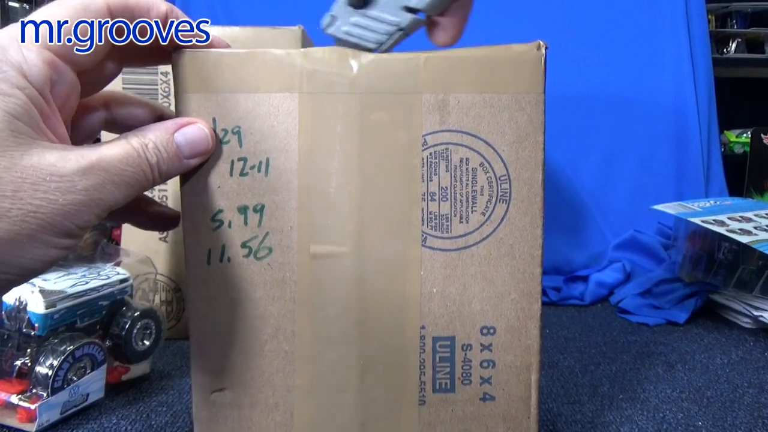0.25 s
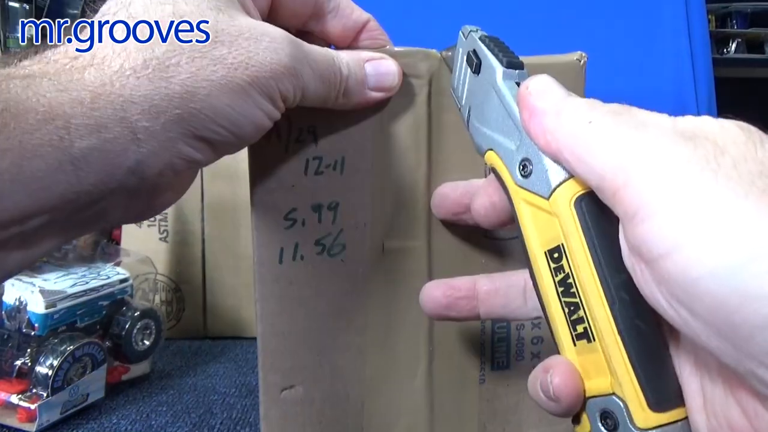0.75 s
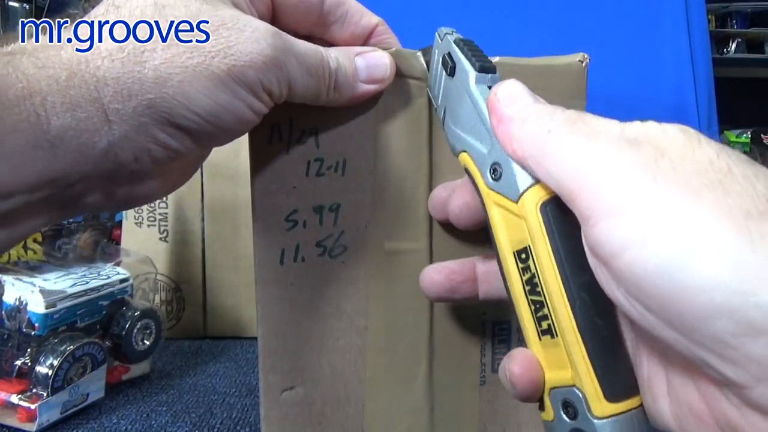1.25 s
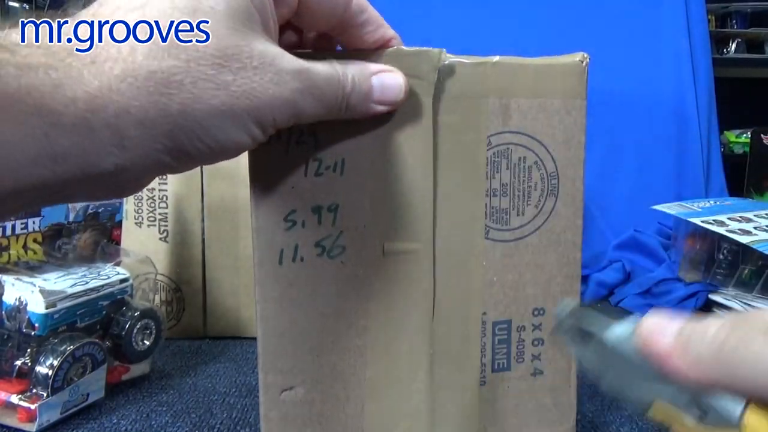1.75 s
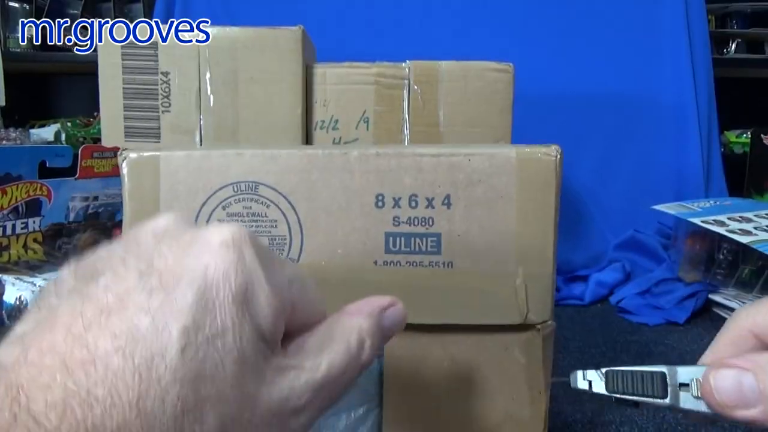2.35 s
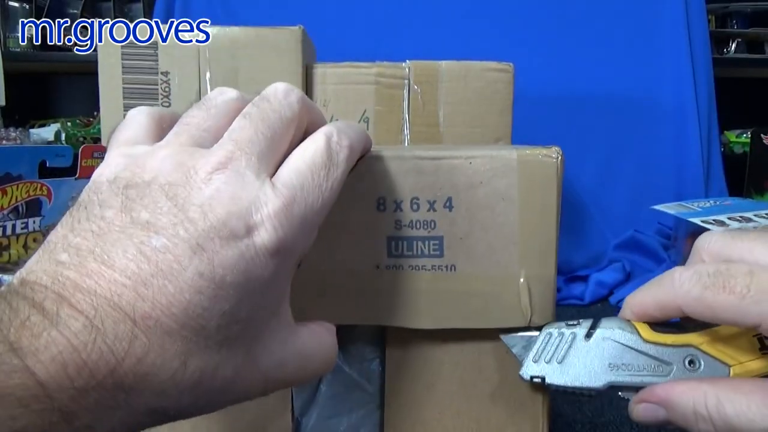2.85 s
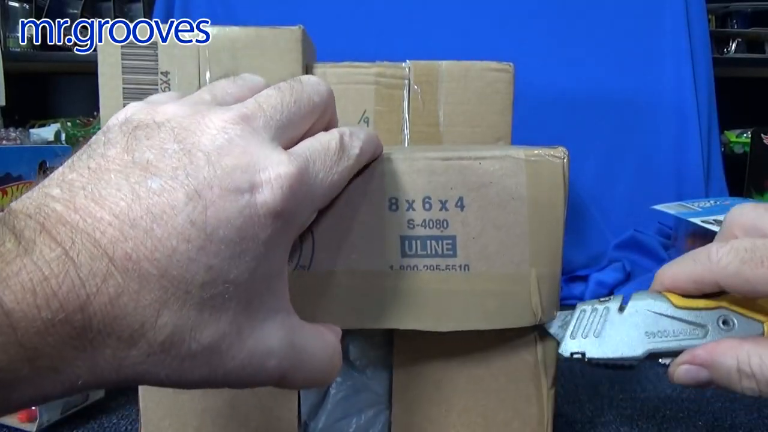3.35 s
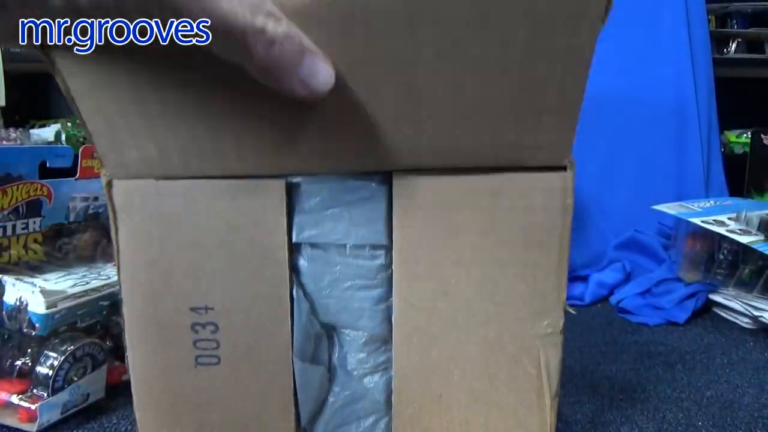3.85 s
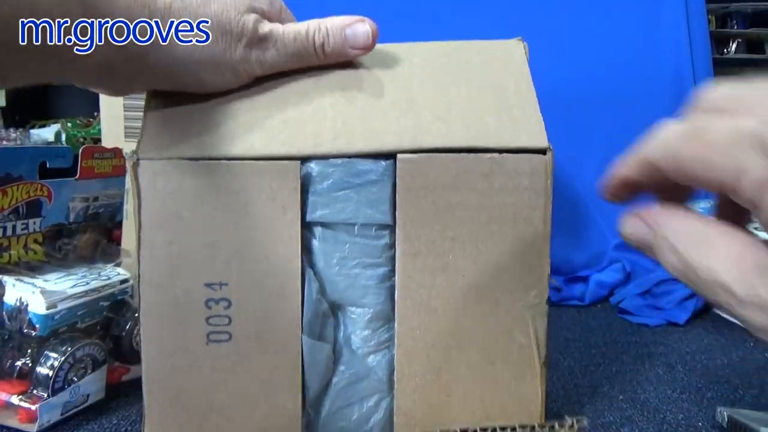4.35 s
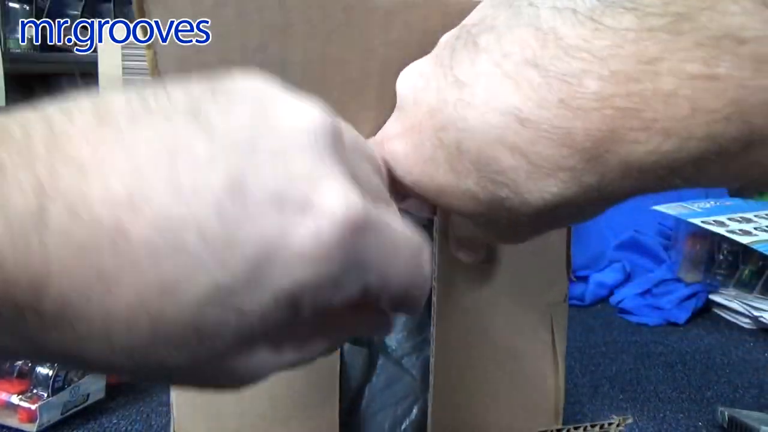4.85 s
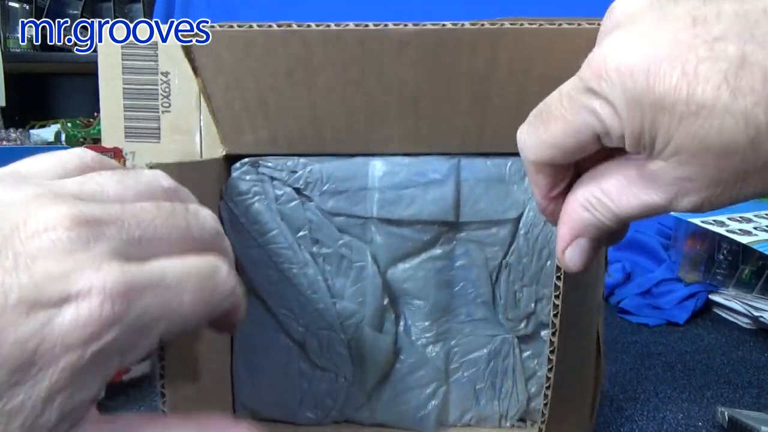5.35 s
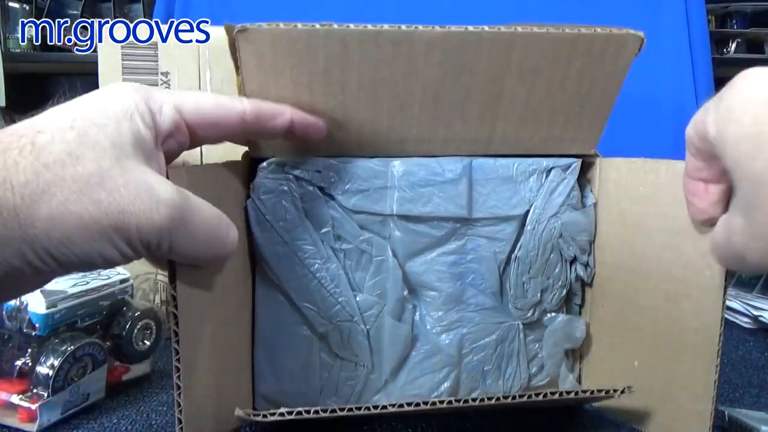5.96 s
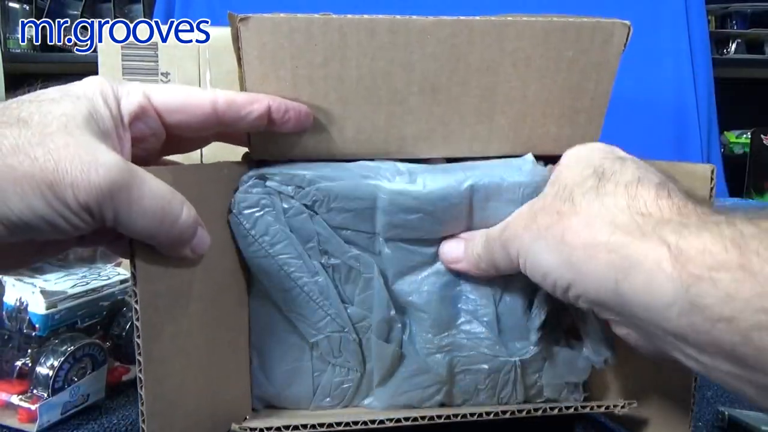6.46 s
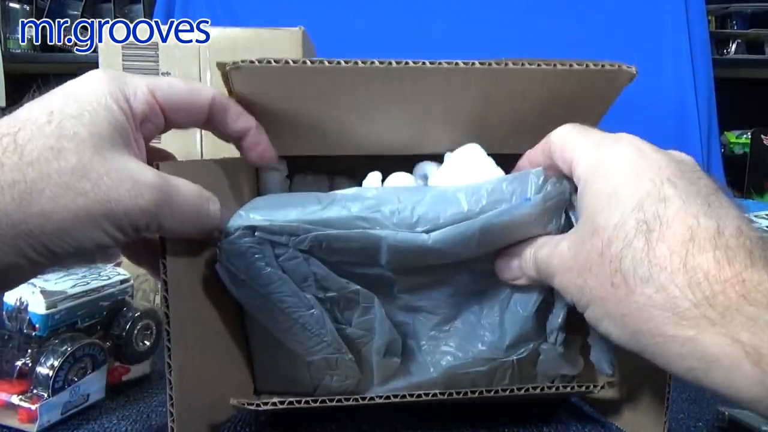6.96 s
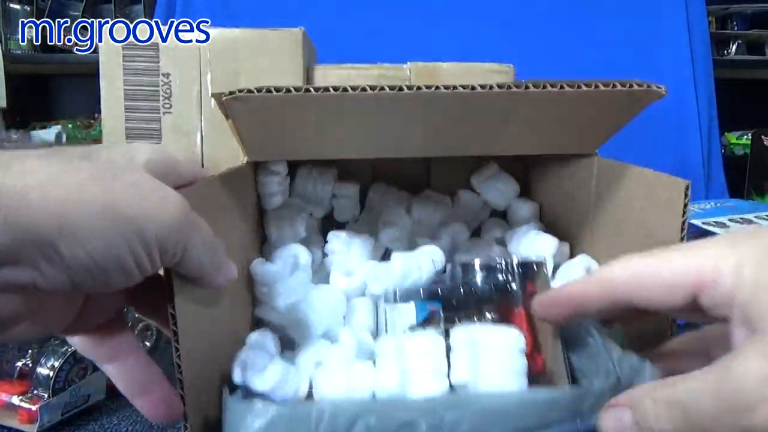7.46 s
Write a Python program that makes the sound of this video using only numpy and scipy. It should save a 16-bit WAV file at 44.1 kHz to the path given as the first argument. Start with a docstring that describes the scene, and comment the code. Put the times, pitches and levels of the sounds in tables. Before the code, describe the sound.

Close up in a small, dry-sounding room, a cardboard box is tapped and nudged across a cloth-covered table. A short rasp of a blade in tape leads to two loud snaps as the flaps come free, with small ticks of tape and creases. Cardboard then rubs against cardboard as the box opens wide, and the sound ends with a soft rustle of plastic and a few light bumps.

```python
"""Unpacking a small cardboard box

Hands turn a box on a cloth-covered table, a blade slits its tape, flaps pop open and slide, and a
plastic bag is lifted out, close up in a small damped room. Knocks and stick-slip rubbing set the
hollow box ringing, bumps thump the table, and tape and board tick as their creases let go."""
import sys
import numpy as np
from scipy import signal
from scipy.fft import rfft, irfft
from scipy.io import wavfile
from scipy.ndimage import uniform_filter1d

SR = 44100
rng = np.random.default_rng(int(sys.argv[2]) if len(sys.argv) > 2 else 0)


def put_to_file(sound):
    """Save the sound as 16-bit audio at rate SR, in the file named by the first command-line argument."""
    columns = np.atleast_2d(sound).T  # one column per channel
    safe = np.clip(columns, -1, 1)
    whole_steps = np.round(safe * 32767)
    wavfile.write(sys.argv[1], SR, whole_steps.astype(np.int16))


N = 340011


def gain_of(db):
    """Decibels to amplitude."""
    return 10 ** (np.asarray(db) / 20)


def unit_rms(x):
    """Scales to rms 1."""
    return x / np.sqrt(np.mean(x ** 2) + 1e-20)


def at_peak(x, db):
    """Scales to a peak level in dB."""
    return gain_of(db) * x / abs(x).max()


def curve_at(points, hz):
    """Value of a curve on a log-frequency axis."""
    f, value = np.transpose(points)
    return np.interp(np.log(hz + 1), np.log(f + 1), value)


def add(mix, start, sound):
    """Mixes a sound in at a time in seconds."""
    part = mix[max(round(start * SR), 0):][:len(sound)]
    part += sound[:len(part)]


def high_pass(x, hz):
    """A small body radiates no deep bass."""
    return signal.sosfilt(signal.butter(3, hz, "high", fs=SR, output="sos"), x)


def impulse(points):
    """Minimum-phase impulse response of an EQ curve."""
    db = np.maximum(curve_at(points, abs(np.fft.fftfreq(4096, 1 / SR))), -100)
    log_gain = signal.hilbert(np.log(gain_of(db)))
    return np.fft.ifft(np.exp(np.conj(log_gain))).real[:2048]


def excite(drive, response):
    """Plays a scene-long signal through an impulse response."""
    return signal.oaconvolve(drive, response)[:N]


def rings(modes, seconds):
    """One dying sine for each mode."""
    hz, db, t60 = np.transpose(modes)[:, :, None]
    t = np.arange(round(seconds * SR)) / SR
    return gain_of(db - 60 * t / t60) * np.sin(2 * np.pi * hz * t)


def slips(per_s, spread_db, flutter_db, flutter_s):
    """Stick-slip clicks of random sign and size whose strength flutters with the grip."""
    size = gain_of(spread_db * np.minimum(rng.exponential(1, N), 5)) * rng.standard_normal(N)
    hit = rng.random(N) < per_s / SR
    window = max(int(flutter_s * SR), 2)
    grip = unit_rms(uniform_filter1d(uniform_filter1d(rng.standard_normal(N), window), window))
    return size * hit * gain_of(flutter_db * grip)


# Tone of the cardboard's hiss and snaps. Each row: frequency in Hz, gain in dB.
SURFACE_EQ = [(1500, -16.5), (2900, -22.5), (4100, -25.5), (5000, -20.5), (6500, -20.5), (10500, -21.5),
              (16000, -28)]


def surface_spot(chance):
    """The surface's impulse response, with other bands favoured at each spot."""
    hz = np.geomspace(1500, 16000, 10)
    db = curve_at(SURFACE_EQ, hz) + 4.5 * chance[:len(hz)]
    return impulse(np.transpose([hz, db]))


# Resonances of the hollow box. Each row: frequency in Hz, relative level in dB, t60 in seconds.
BOX_MODES = [(257, 1, 0.028), (355.6, 0, 0.049), (430, 8.5, 0.038), (534, 10.5, 0.025), (744, 5.5, 0.016),
             (946, 7.5, 0.01), (1020, 8, 0.012), (1374, 5, 0.01), (2033, -2.5, 0.0071), (2470, -14, 0.0084)]
# Knocks, flap pops and tape snaps. Each row: time in seconds, panel peak in dB, cavity peak in dB,
# favoured cavity pitch in Hz, snap peak in dB.
KNOCK_HITS = [(0.037, -40, -41.5, 360, -41.5), (0.088, -46, -34.5, 540, -51), (0.363, -21, -28, 500, -20.5),
              (0.371, -45, -14.5, 420, -40), (0.493, -33, -27.5, 263, -38), (0.549, -33, -43, 264, -30.5),
              (0.811, -36.5, -41, 268, -48), (1.183, -59, -43, 579, -22), (1.359, -27.5, -28.5, 540, -28),
              (1.474, -40, -36.5, 455, -31), (1.691, -33, -21, 550, -48), (1.946, -28.5, -27.5, 580, -78),
              (2.065, -36.5, -48, 404, -45.5), (2.195, -18.5, -42, 580, -25), (2.207, -4.5, -10, 310, -6.5),
              (2.232, -12, -17.5, 240, -18), (2.291, -15.5, -15, 265, -45), (2.466, -42.5, -35.5, 254, -68),
              (2.867, -55.5, -28.5, 272, -62), (3.199, -27.5, -16, 397, -65),
              (3.322, -22.5, -22.5, 222, -17), (3.5506, -6, -8.5, 420, -5), (3.671, -28, -30, 406, -31),
              (4.797, -58, -37, 220, -42), (4.96, -45, -36.5, 444, -43), (4.998, -34, -22.5, 443, -41),
              (5.114, -26, -28, 498, -64), (5.322, -18.5, -16.5, 520, -56), (5.681, -20, -16, 326, -23.5),
              (5.856, -38, -22.5, 447, -34.5), (6.024, -56, -25.5, 225, -27), (6.308, -51, -27, 365, -48),
              (6.649, -46, -27.5, 514, -39), (6.709, -28, -28, 343, -45), (6.916, -25.5, -42, 543, -87),
              (7.002, -32.5, -39, 540, -86), (7.058, -28.5, -36, 228, -90), (7.573, -26.5, -31.5, 377, -36)]


def knocks():
    """A faint noise swell leads into each ragged blow, which rings cavity and panel and snaps on top."""
    out, mode_hz = np.zeros(N), np.transpose(BOX_MODES)[0]
    lead_s, panel_from_hz = .04, 700
    t = np.arange(-lead_s, .04, 1 / SR)
    after = np.maximum(t, 0)
    lead_in = np.where(t < 0, .02, .06) * np.exp(-abs(t) / 0.0096)
    blow = lead_in + after / 0.0031 * np.exp(1 - after / 0.00065)
    crackle_tail = (t > 0) * 0.11 * np.exp(-after / 0.028)
    crackle = 1.7 * lead_in + after / 0.00078 * np.exp(1 - after / 0.0012) + crackle_tail
    push = (t > 0) * np.sin(after / 0.0058) * np.exp(-after / 0.0059)  # air shoved by the board
    for start, panel_db, cavity_db, hz, snap_db in KNOCK_HITS:
        cavity_noise, panel_noise, snap_noise = rng.standard_normal((3, len(t)))
        retune = 1 + 0.041 * snap_noise[0]  # the grip retunes the box a little
        box = rings(np.multiply(BOX_MODES, [retune, 1, 1]), .12)
        cavity_mix = (mode_hz < panel_from_hz) * gain_of(-30 * np.log2(mode_hz / hz) ** 2)
        cavity = high_pass(signal.fftconvolve(cavity_mix @ box, (1 + .5 * cavity_noise) * blow), 188)
        tilt_db_per_octave = min(1.1 * (snap_db - panel_db + 11.0), 5.5)  # snappy blows ring brighter
        panel_mix = (mode_hz >= panel_from_hz) * gain_of(tilt_db_per_octave * np.log2(mode_hz / 1000))
        panel = high_pass(signal.fftconvolve(panel_mix @ box, panel_noise * blow), 446)
        snap = signal.fftconvolve(snap_noise * crackle, surface_spot(cavity_noise))
        skip = max(round((lead_s - start) * SR), 0)
        for db, sound in ((panel_db, panel), (panel_db - 28, push), (cavity_db, cavity), (snap_db, snap)):
            add(out, start - lead_s, at_peak(sound, db)[skip:])
    return out


def contact_power(strokes, scratch_db):
    """Power of hiss, drone and scratch over all strokes; the scratch follows a blend of the other two."""
    power, drone_share = np.zeros((3, N)), 0.28
    for start, length, hiss_db, drone_db in strokes:
        span = slice(round(start * SR), round((start + length) * SR))
        blend_db = hiss_db + drone_share * (drone_db - hiss_db)
        power[:, span] += gain_of([[hiss_db], [drone_db], [blend_db + scratch_db]]) ** 2
    return power


def wander(x, depth_db):
    """The rubbed spot wanders, so bands of the noise swell and fade on their own."""
    bands = signal.stft(x, nperseg=256)[2]
    swell = uniform_filter1d(rng.standard_normal(bands.shape), size=7, axis=0)
    swell = unit_rms(uniform_filter1d(swell, size=18, axis=1))
    return unit_rms(signal.istft(bands * gain_of(depth_db * swell), nperseg=256)[1][:N])


# Skin, blade and flaps stroke the board; fingers grip the bag.
# Each row: start in seconds, length in seconds, hiss level in dB, box drone level in dB.
BOARD_STROKES = [(0.0, 0.78, -72.5, -61), (0.15, 0.32, -55, -49.5), (0.33, .18, -53.5, -40),
                 (0.51, 0.13, -58.5, -59), (1.18, 0.078, -64, -46.5), (1.43, 0.29, -59, -55.5),
                 (1.47, 0.13, -51, -47), (1.64, 0.062, -50, -40.5), (1.71, 0.8, -68.5, -57),
                 (1.88, 0.084, -57, -54), (2.15, 0.23, -56.5, -47.5), (2.72, 0.24, -57, -56),
                 (2.83, 0.027, -45, -51), (2.95, 3.1, -65, -62.5), (3.32, 0.058, -48, -43),
                 (3.475, 0.025, -78, -41), (3.5, 0.063, -48, -37.5), (3.63, 0.75, -59.5, -64),
                 (3.82, 0.293, -52, -50.5), (4.43, 0.11, -54, -56), (4.71, 0.24, -56.5, -66.5),
                 (5.0, 0.73, -46.5, -43.5), (5.13, 0.15, -41, -55), (5.34, 0.074, -40, -55),
                 (5.45, 0.056, -42, -53), (5.69, 0.017, -31, -30), (5.73, 0.53, -59, -50),
                 (5.94, 0.24, -57.5, -45)]
BAG_GRIPS = [(6.27, 1.4, -53, -52), (6.28, 0.51, -54, -55), (6.43, 0.11, -45, -43),
             (6.5, 0.072, -44.5, -52), (6.59, 0.15, -46.5, -46), (6.77, 0.16, -49.5, -46.5),
             (7.05, 0.244, -56.5, -51.5), (7.32, 0.097, -50.5, -53), (7.57, 0.19, -51.5, -43.5)]
# Tone of the midrange scratch and of the bag's hiss. Each row: frequency in Hz, gain in dB.
SCRATCH_EQ = [(550, -26.5), (1100, -10), (1500, -13.5), (2100, -17.5), (3600, -22), (8000, -57)]
BAG_EQ = [(1200, -25.5), (2500, -24.5), (3400, -29.5), (5800, -21), (7000, -22), (16000, -28)]


def rubbing():
    """Trains of slips drive the surface, the board, the box and, through the box, the table."""
    resting_hands = (0.008, N / SR, -76, -68.5)  # one faint, scene-long stroke
    board = contact_power(BOARD_STROKES + [resting_hands], scratch_db=-4.5)
    bag = contact_power(BAG_GRIPS, scratch_db=-8.5)  # the soft bag scratches less
    power, fade_s = board + bag, 0.025
    levels_db = uniform_filter1d(10 * np.log10(power + 1e-12), int(fade_s * SR), axis=1)
    hiss_gain, drone_gain, scratch_gain = gain_of(levels_db)
    bag_share = np.clip(bag[0] / power[0], 0, 1)
    fine = slips(per_s=9000, spread_db=1.5, flutter_db=0.9, flutter_s=0.02)
    sparse = slips(per_s=45, spread_db=2.0, flutter_db=2.4, flutter_s=0.091)
    coarse = slips(per_s=1500, spread_db=2.0, flutter_db=3.0, flutter_s=0.012)
    on_board, on_bag = (unit_rms(excite(fine, impulse(eq))) for eq in (SURFACE_EQ, BAG_EQ))
    hiss = hiss_gain * wander((1 - bag_share) * on_board + bag_share * on_bag, depth_db=2.27)
    # now and then a fibre lets go alone, even under a light touch
    ticks = gain_of(-43.5) * np.sqrt(hiss_gain) * unit_rms(excite(sparse, impulse(SURFACE_EQ)))
    gritty = slips(per_s=3000, spread_db=1.3, flutter_db=2.7, flutter_s=0.0098)
    scratch = scratch_gain * wander(excite(gritty, impulse(SCRATCH_EQ)), depth_db=3.5)
    # each low mode is fed from its own spot of the board
    low_modes = rings(BOX_MODES, .12)[:6]
    box = sum(excite(np.roll(coarse, 9000 * k), mode) for k, mode in enumerate(low_modes))
    table = excite(coarse, rings(TABLE_MODES, .25).sum(axis=0))
    drone = unit_rms(high_pass(box, 247)) + gain_of(-11) * unit_rms(high_pass(table, 72))
    return hiss + ticks + scratch + drone_gain * drone


def friction_band(path, width):
    """Slips sing in a resonance that glides with the contact; width is a fraction of its mean pitch."""
    times, db, hz = np.transpose(path)
    t = np.arange(times[0], times[-1], 1 / SR)
    carrier = np.exp(2j * np.pi * np.cumsum(np.interp(t, times, hz)) / SR)
    pole = np.exp(-np.pi * width * hz.mean() / SR)
    friction = slips(per_s=6600, spread_db=2.7, flutter_db=1.4, flutter_s=0.012)[:len(t)]
    band = (carrier * signal.lfilter([1], [1, -2 * pole, pole * pole], friction / carrier)).real
    envelope = gain_of(np.interp(t, times, db)) * signal.windows.tukey(len(t), .1)
    out = np.zeros(N)
    add(out, times[0], envelope * unit_rms(band))
    return out


# Sliding moves, one path per gesture. Each row: time in seconds, level in dB, band centre in Hz.
FLAP_SLIDES = [
    [(5.0, -65, 905), (5.09, -47.5, 1200), (5.22, -36.5, 1660), (5.3, -39.5, 1410)],
    [(5.33, -40, 2040), (5.43, -52, 1860), (5.47, -49, 2010), (5.58, -64, 1970)],
    [(5.4, -55, 408), (5.53, -45, 370), (5.68, -42, 364)],
]  # flaps sing, jump higher after a catch and groan at a fold
BLADE_WHISPER = [(2.95, -66, 4200), (3.19, -75, 4150)]  # the tip skims along the tape
# first the blade rasps in the tape, then the board creaks sharply just before a flap pops open
RASP_AND_CREAK = [
    [(1.47, -57, 1300), (1.56, -46, 1860), (1.6, -64, 1500)],
    [(2.165, -57.5, 1600), (2.199, -17, 1400), (2.206, -31, 1300)],
]
BOX_DRAGS = [
    [(.22, -44, 112), (.3, -42, 127), (.41, -33.5, 147), (.52, -43, 140)],
    [(5.42, -52, 122), (5.6, -51.5, 129), (5.78, -47, 115)],
]  # the table hums low


def slides():
    """Flaps, blade, creaking board and the box dragging on cloth each sound in a gliding band."""
    singing = sum(friction_band(path, width=0.23) for path in FLAP_SLIDES + [BLADE_WHISPER])
    rough = sum(friction_band(path, width=0.68) for path in RASP_AND_CREAK + BOX_DRAGS)
    return singing + rough


# Single ticks of tape and board. Each row: start in seconds, peak in dB.
CREASE_TICKS = [(0.0594, -41.5), (0.265, -35.5), (0.35, -33), (0.381, -32), (0.4244, -37), (0.446, -24),
                (0.7116, -39), (0.88, -46), (1.3498, -36.5), (1.6841, -35), (1.83, -43.5), (1.886, -38),
                (1.935, -27.5), (2.31, -34), (2.3496, -39), (3.408, -45), (3.559, -15), (3.862, -47),
                (3.975, -36), (4.2358, -44)]


def creases():
    """A crease lets go in a burst of a millisecond or two, bright and without body."""
    out, t = np.zeros(N), np.arange(400) / SR
    for start, db in CREASE_TICKS:
        noise = rng.standard_normal(len(t))
        burst = noise * t * np.exp(-t / 0.00075)
        tick = high_pass(signal.fftconvolve(burst, surface_spot(noise[::-1])), 2650)
        add(out, start, at_peak(tick, db))
    return out


# The table top under its cloth. Each row: frequency in Hz, relative level in dB, t60 in seconds.
TABLE_MODES = [(61.5, -16, 0.046), (103, -15.5, 0.2), (143, -1.5, 0.055), (202, -9.5, 0.26)]
# The box bumps the table. Each row: start in seconds, peak in dB.
TABLE_BUMPS = [(2.199, -25), (2.268, -25.5), (3.315, -32), (3.541, -23.5), (4.074, -40), (4.314, -38),
               (4.788, -38.5), (4.991, -35), (5.683, -29), (6.013, -35), (6.139, -32), (6.303, -42.5),
               (7.622, -32)]


def bumps():
    """A soft push rings the table top, at another spot each time."""
    out, table = np.zeros(N), rings(TABLE_MODES, 0.36)
    for start, db in TABLE_BUMPS:
        spot = rng.uniform(0.096, 1, len(TABLE_MODES))
        thump = high_pass(signal.fftconvolve(spot @ table, np.hanning(300)), 85)
        add(out, start, at_peak(thump, db))
    return out


# One squeak: start in seconds, level before the stutter in dB, pitch in Hz, t60 in seconds.
BAG_SQUEAK = (6.508, -38, 5850, .1)


def bag_squeak():
    """A brief high ring that stutters as the plastic slips under a finger."""
    start, db, hz, t60 = BAG_SQUEAK
    out, slip_s = np.zeros(N), .014
    ring = rings([(hz, db, t60)], 0.045)[0]
    stutter = abs(np.sin(np.pi * np.arange(len(ring)) / SR / slip_s))
    add(out, start, ring * stutter)
    return out


# Decay of the damped room. Each row: frequency in Hz, t60 in seconds.
ROOM_DECAY = [(100, 0.18), (1500, 0.11), (12000, 0.12)]


def reverb(x):
    """Sparse reflections of random sign, each band dying at its own speed."""
    taps = np.zeros(SR // 2)
    slots = np.arange(200, len(taps) - 20, 20)
    taps[slots + rng.integers(0, 20, len(slots))] = rng.choice([-1., 1.], len(slots))
    hz, t, bands = signal.stft(taps, SR, nperseg=256)
    decay = gain_of(-60 * t / curve_at(ROOM_DECAY, hz)[:, None])
    tail = signal.istft(bands * decay, SR, nperseg=256)[1]
    return excite(x, tail / np.linalg.norm(tail))


# Colour of the room tone. Each row: frequency in Hz, gain in dB.
ROOM_TONE_EQ = [(15, -9.5), (40, -1.5), (70, -4), (400, -13), (900, -46), (1600, -25.5), (4000, -35.5),
                (16000, -57)]


def room_tone(level_db=-64):
    """A steady bed of low rumble and faint hiss."""
    colour = gain_of(curve_at(ROOM_TONE_EQ, np.fft.rfftfreq(N, 1 / SR)))
    noise = irfft(rfft(rng.standard_normal(N)) * colour, N)
    return gain_of(level_db) * unit_rms(noise)


def scene():
    """The handled box over room tone, in mono; only the hits feed the reverb."""
    hits = knocks() + bumps() + creases()
    return (hits + slides() + gain_of(-11) * reverb(hits) + rubbing() + bag_squeak() + room_tone())[None]


def record(dry):
    """A steep low-pass trims the very top of the treble."""
    cutoff_hz = 15950
    low_pass = signal.firwin(511, cutoff_hz, window=("kaiser", 9), fs=SR)
    return signal.oaconvolve(dry, low_pass[None], "same")


dry = scene()
out = record(dry)
put_to_file(out)
```